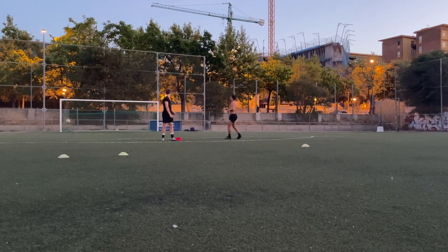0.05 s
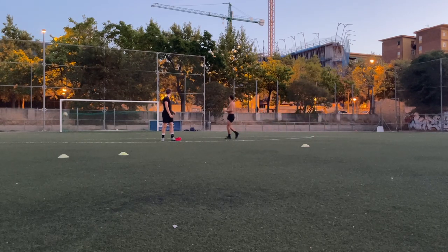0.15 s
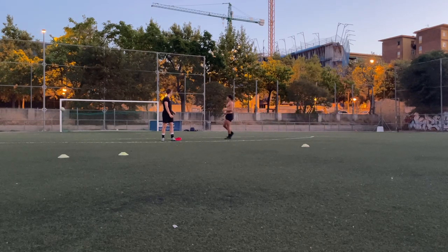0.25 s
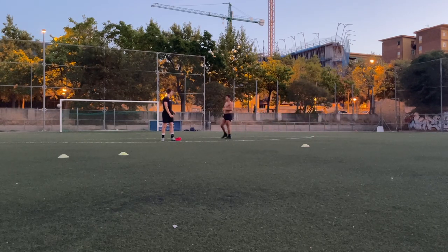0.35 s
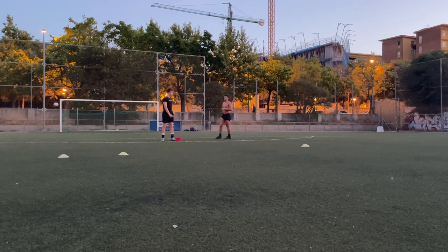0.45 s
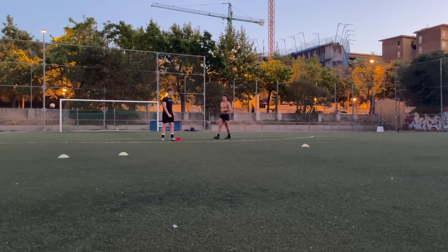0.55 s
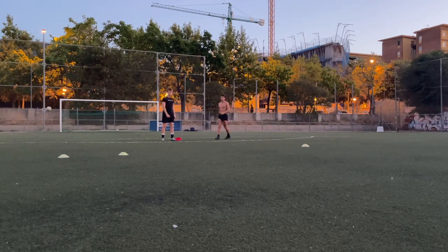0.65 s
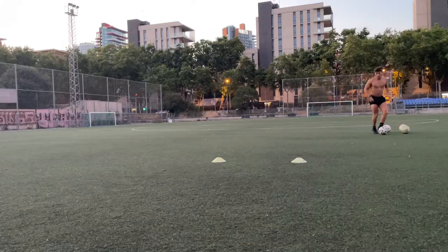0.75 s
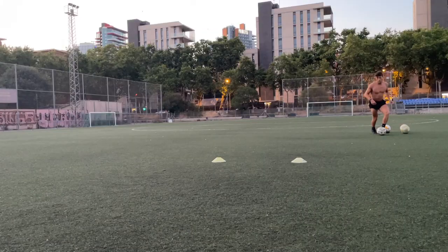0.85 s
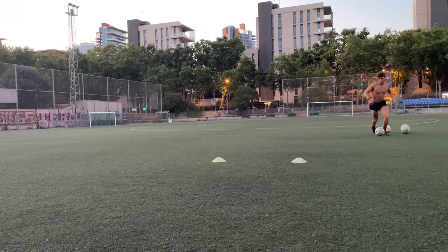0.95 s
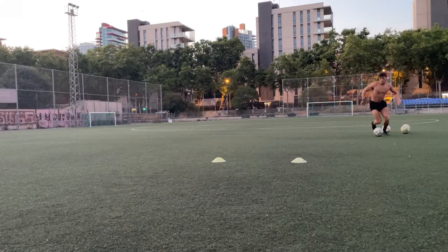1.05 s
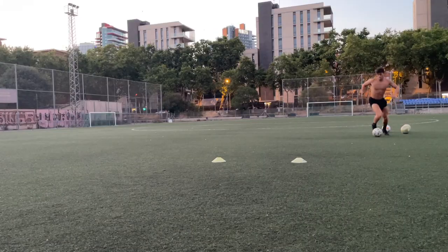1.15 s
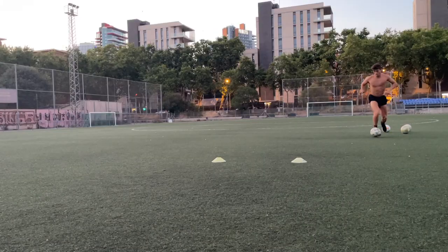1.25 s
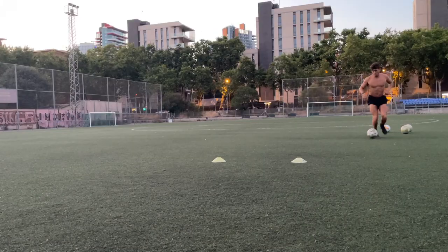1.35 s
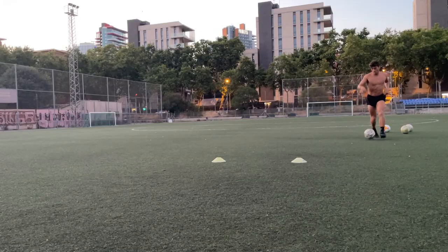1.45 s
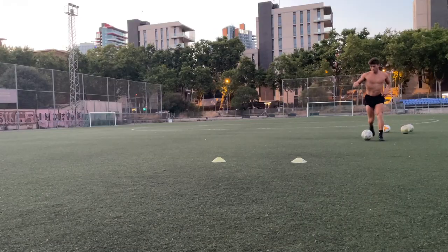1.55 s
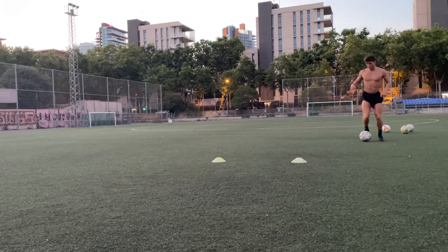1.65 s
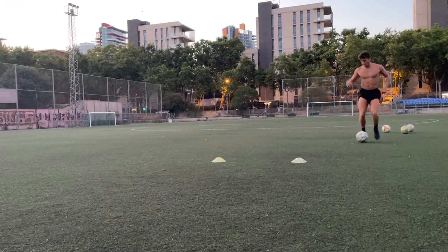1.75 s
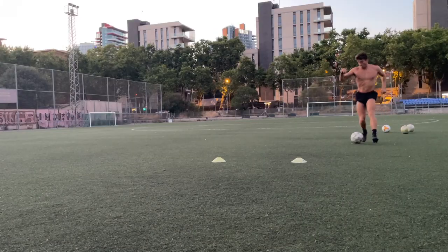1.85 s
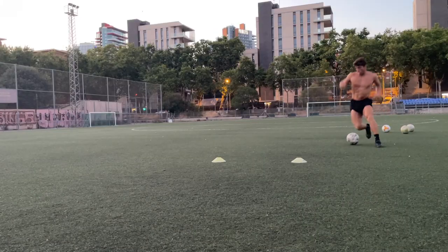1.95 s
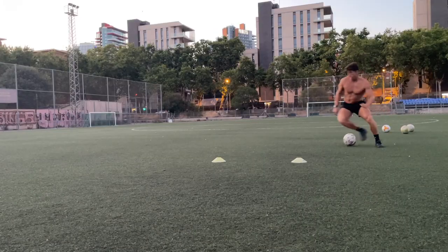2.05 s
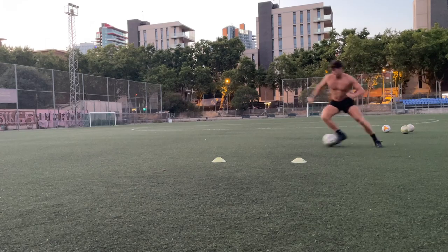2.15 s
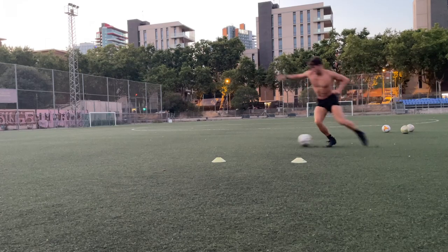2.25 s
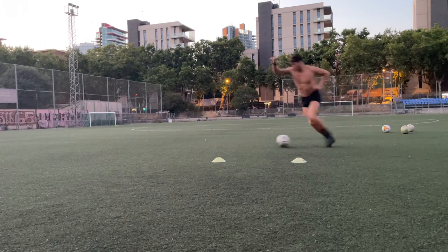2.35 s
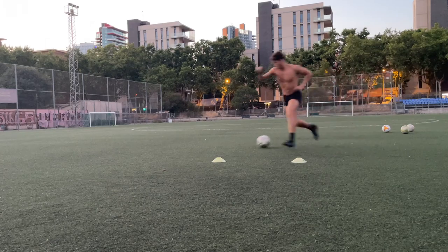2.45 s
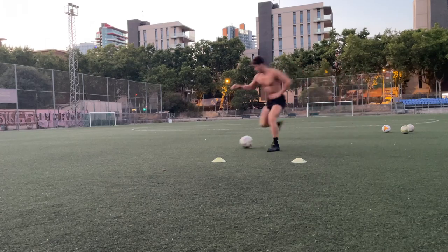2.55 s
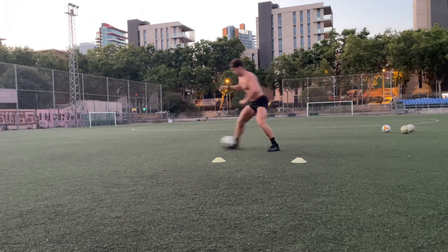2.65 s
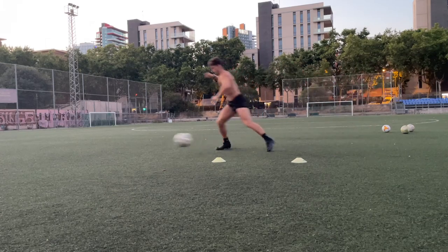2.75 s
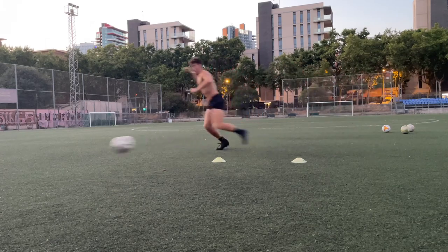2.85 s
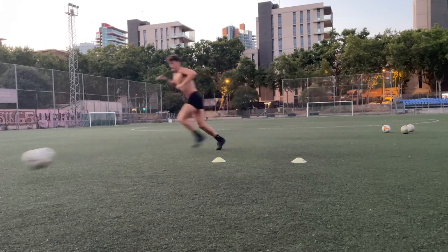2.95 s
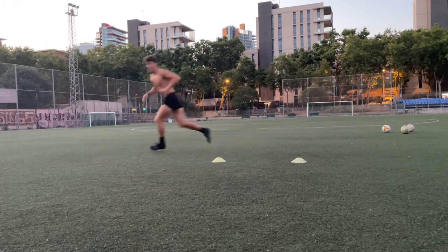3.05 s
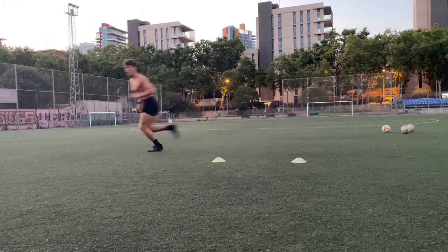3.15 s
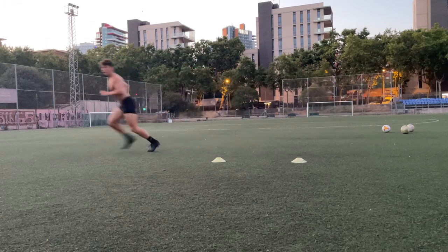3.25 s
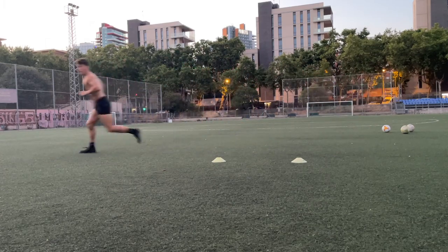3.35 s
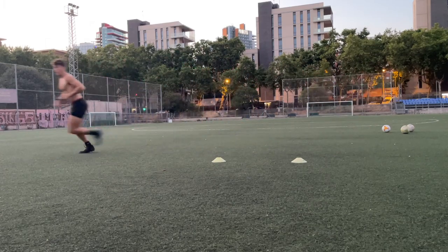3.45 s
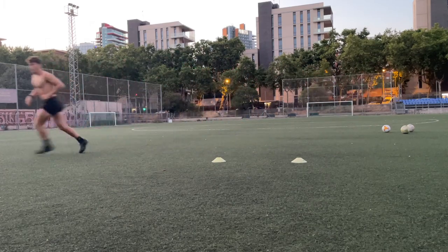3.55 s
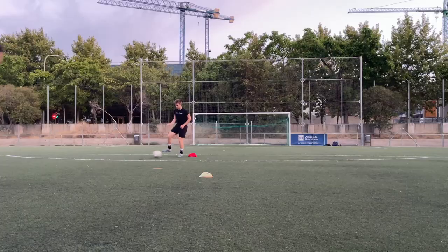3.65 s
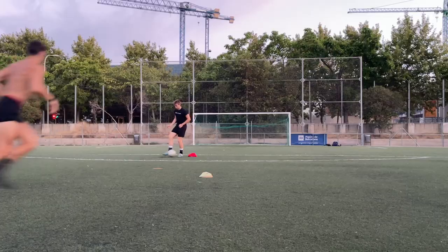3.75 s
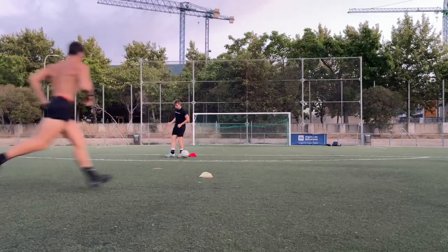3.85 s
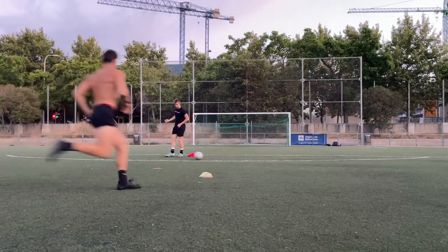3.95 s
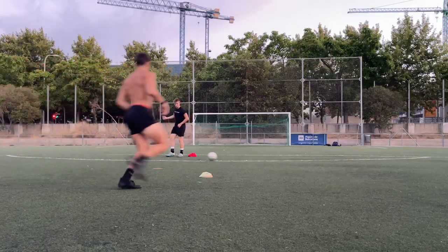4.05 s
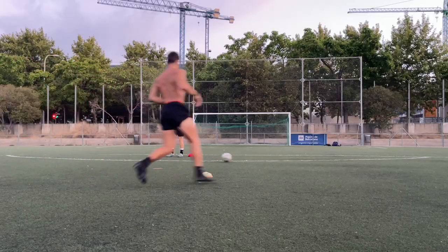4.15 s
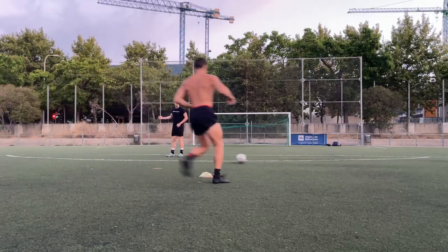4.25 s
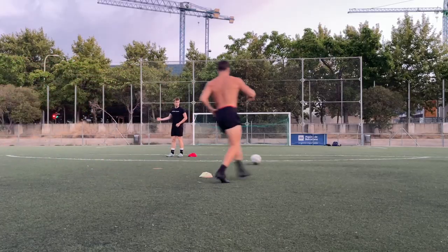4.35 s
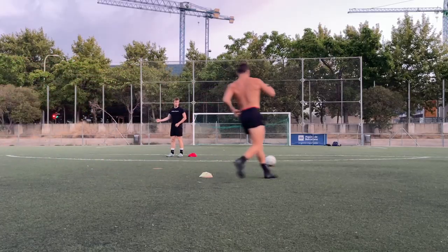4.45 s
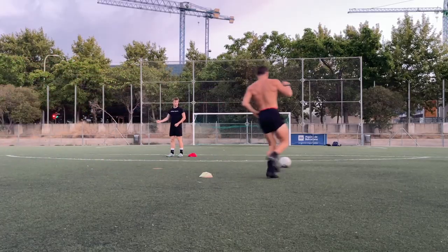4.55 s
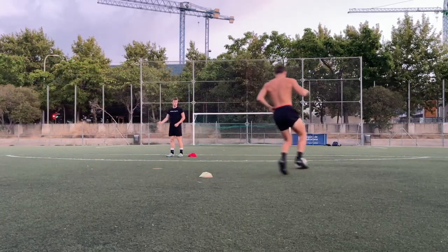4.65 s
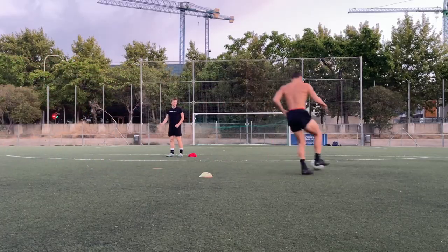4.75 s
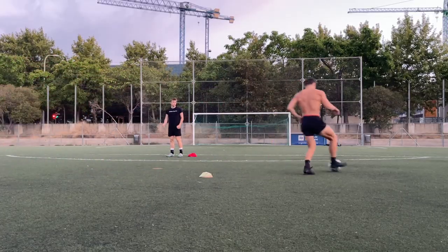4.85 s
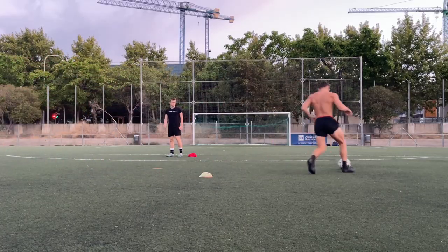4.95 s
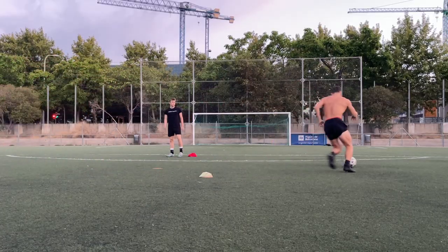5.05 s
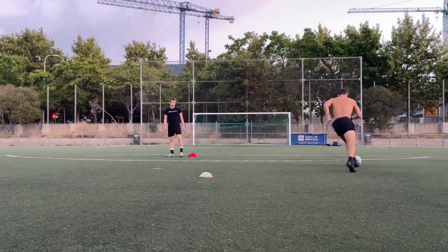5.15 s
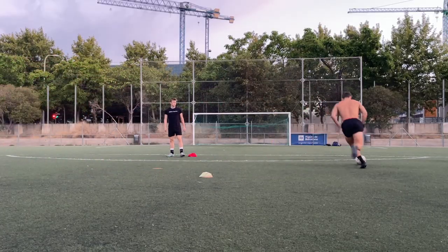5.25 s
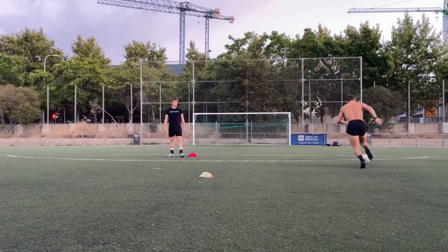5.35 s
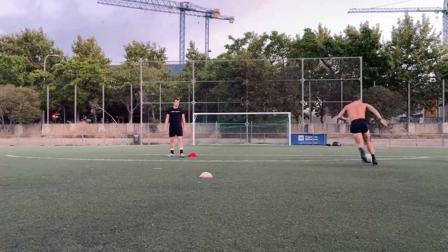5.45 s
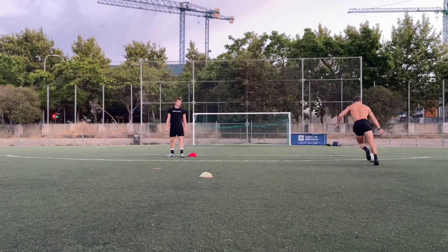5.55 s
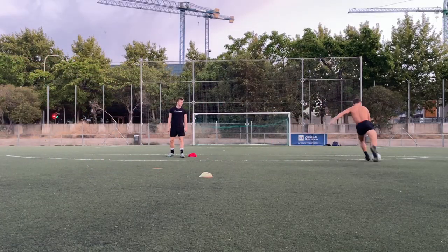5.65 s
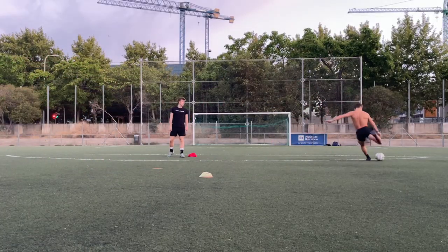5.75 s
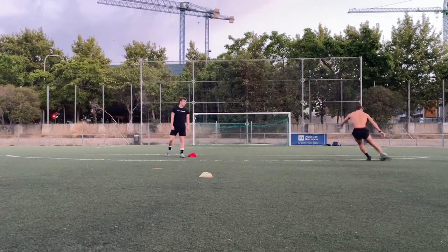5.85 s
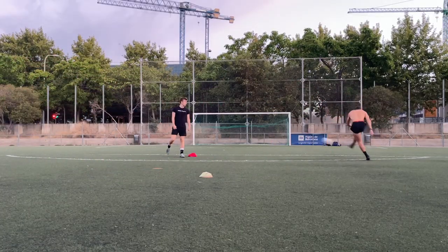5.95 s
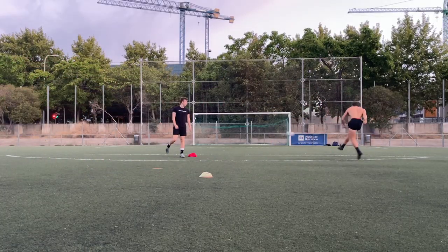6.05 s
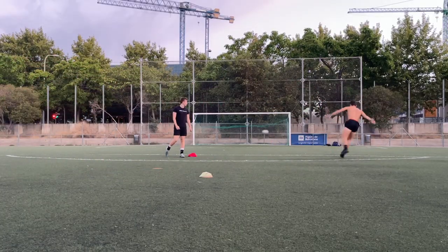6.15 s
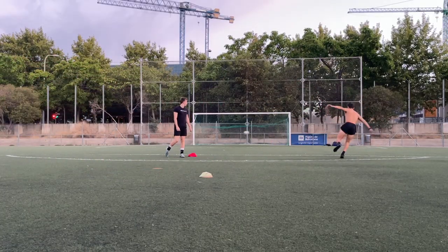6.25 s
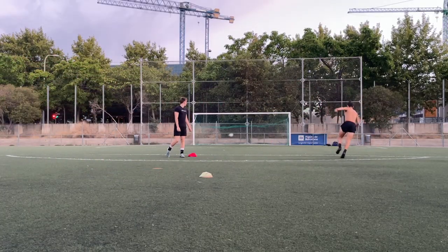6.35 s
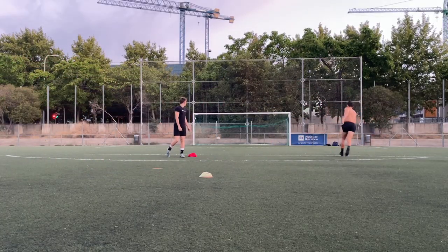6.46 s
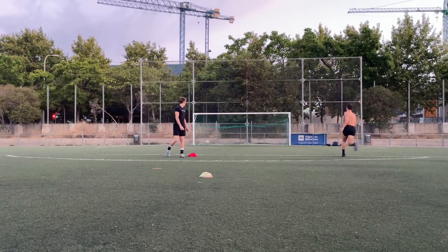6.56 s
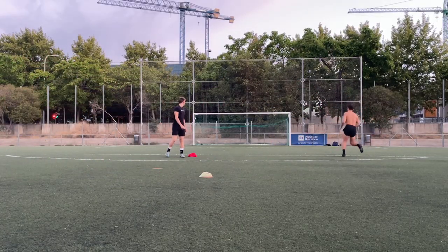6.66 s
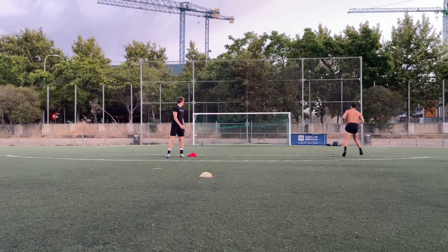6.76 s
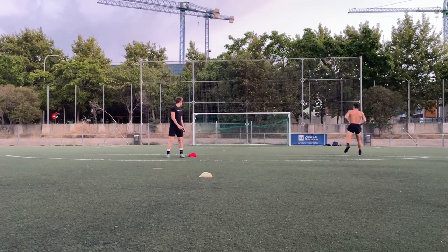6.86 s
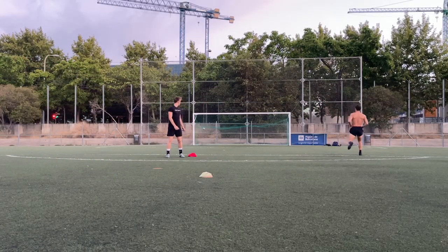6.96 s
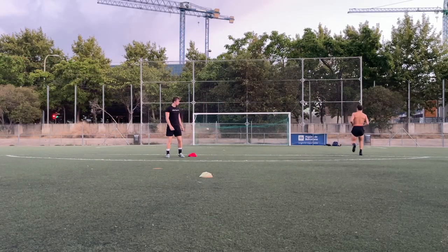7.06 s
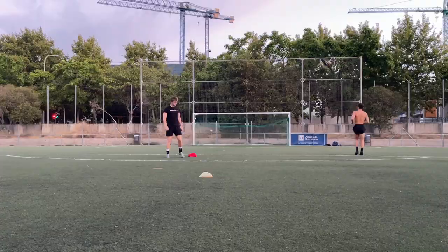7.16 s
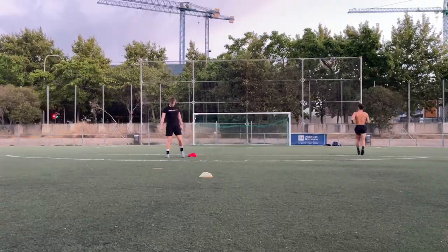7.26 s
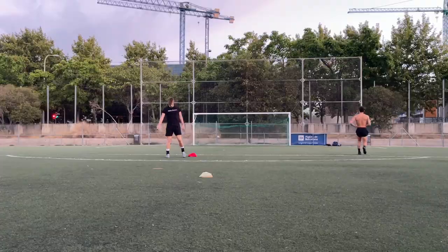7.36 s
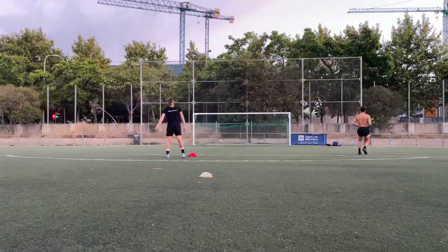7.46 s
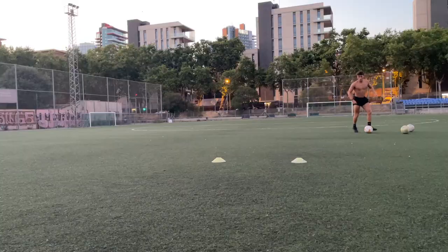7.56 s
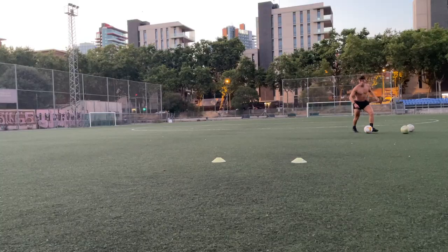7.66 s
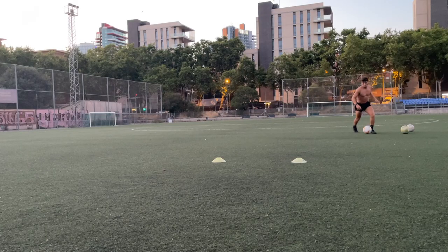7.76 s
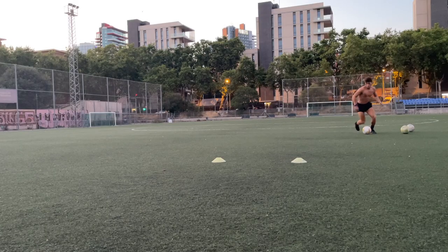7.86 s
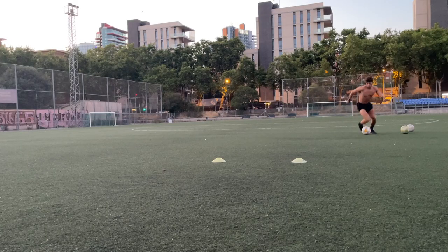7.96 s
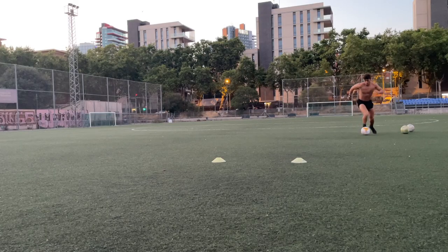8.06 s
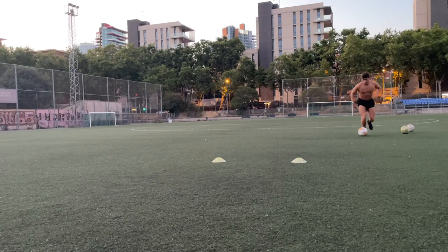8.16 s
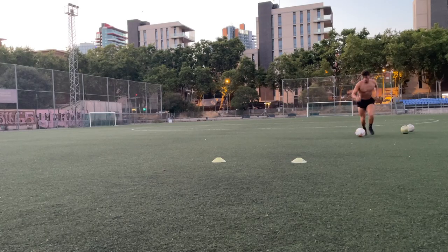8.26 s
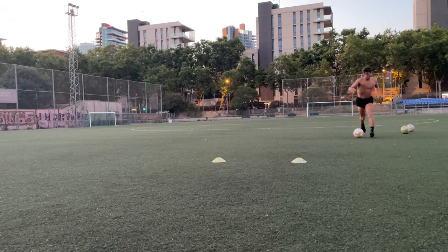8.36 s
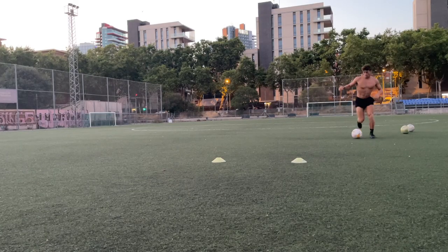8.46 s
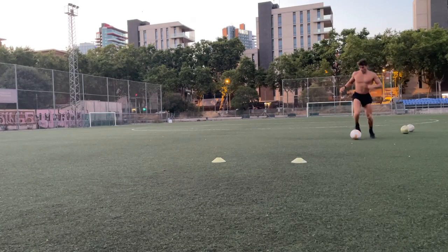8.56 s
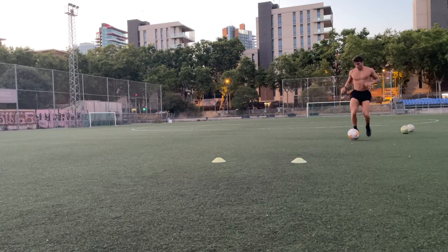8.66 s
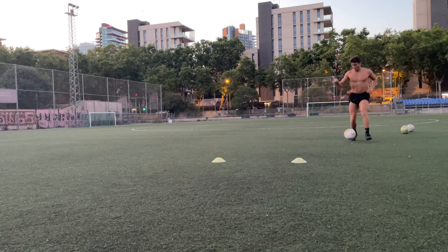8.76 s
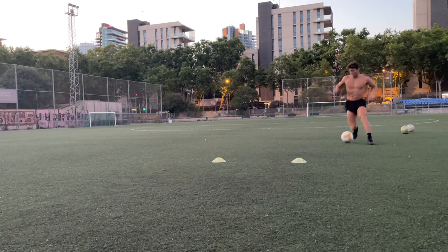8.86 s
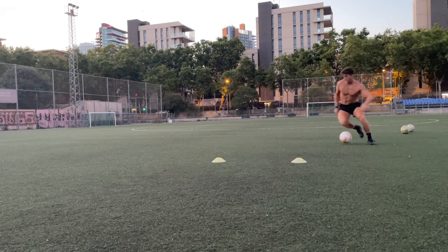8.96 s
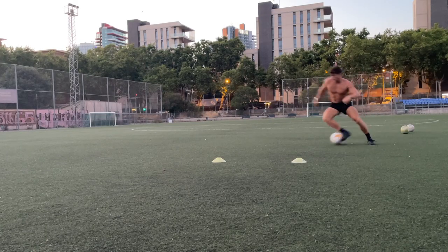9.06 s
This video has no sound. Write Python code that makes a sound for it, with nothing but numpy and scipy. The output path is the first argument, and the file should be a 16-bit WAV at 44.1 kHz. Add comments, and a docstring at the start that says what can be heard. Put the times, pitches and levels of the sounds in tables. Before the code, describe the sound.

Low city traffic rumble under football drills: scuffing boots, deep kick thumps, a booming shot into a rattling wire fence, swifts trilling overhead.

```python
"""Football drills on a city pitch at dusk, heard near a phone, over traffic of shaped noise.
A boom and a fading hiss open; swifts' sine trills, arched whistles and blurred cries recur overhead.
A click, then boots: swept thumps, noise slaps, scuffs and ticks; hollow taps; the ball skims past at 3 s.
A hard shot at 5.9 s booms in the net, then rattles the wire fence (noise grains, ringing wires).
Machinery noise and an idling engine (firing orders) join at 7.5 s. The hardest kicks overload the phone."""
import sys
import numpy as np
from scipy import signal
from scipy.fft import rfft, irfft, next_fast_len
from scipy.io import wavfile
from scipy.ndimage import uniform_filter1d, map_coordinates

SR = 44100
rng = np.random.default_rng(int(sys.argv[2]) if len(sys.argv) > 2 else 0)


def store_pcm(level_fs):
    """Save levels as 16-bit WAV."""
    pcm = np.round(np.clip(level_fs, -1, 1) * 32767).astype(np.int16)
    wavfile.write(sys.argv[1], SR, np.atleast_2d(pcm).T)


N = 401751

# Boot on ball. Each row: start in seconds, boom in dB, body and skin knock in dB over the boom,
# slap in dB before colouring, slap treble in dB against the slap.
KICK_ROWS = [(1.24, -18, -7, -34, -58, -16), (1.244, -33.5, 8, 8.5, -37, -27),
             (1.569, -33, 14, 0.5, -54, -8), (1.9614, -17, 12.5, -7.5, -51, -1),
             (2.1087, -28, 6.5, -2, -22.5, -11), (2.676, -4.5, -4.5, -25.5, -26.5, -17),
             (2.6775, -19.5, 8.5, 3, -14.5, -18.5), (3.5541, -1, -10.5, -19, -9, -12),
             (3.5623, -11, 0, -18, -25, -18), (3.774, -0.5, -3.5, -28, -9, -15.5),
             (3.785, -15.5, 10.5, 10, -34.5, -22), (3.919, -26.5, 3, -25, -36.5, -25),
             (4.9058, -1.5, -3.5, -12, -14.5, -14.5), (5.806, -30, 7.5, -7, -48, -5),
             (5.9041, 8, -1, -12.5, -10, -0.5), (6.585, -31, 7.5, -7, -67, -13),
             (6.723, -24.5, 5, -13, -52, 3), (8.085, -18.5, -11.5, -17, -17.5, -19.5),
             (8.635, -36, 3, 9.5, -50, -15), (8.8781, -17.5, 16, -5, -44, -9),
             (9.0542, -20, 7, 1.5, -17.5, -10.5)]
# Colour of the wire mesh. Each row: frequency in Hz, gain in dB.
MESH_COLOUR = [(500, -54), (1000, -8), (1600, -5), (2200, 0.5), (3300, 2.5), (4000, -0.5), (6200, -7),
               (7300, -11), (7900, -50), (9200, -39), (9800, -14), (11500, -16.5), (12800, -19),
               (14200, -88)]
# Backdrop levels, held from each start. Each row: start in seconds, drone, tyre roar and hiss in dB.
BACKDROP_STEPS = [(0, -38, -44.5, -58), (0.719, -45, -49.5, -57.5), (3.634, -39.5, -45, -48.5),
                  (7.523, -43, -48.5, -48)]


def amp(db):
    """Amplitude ratio of a level in dB."""
    return 10 ** (np.asarray(db) / 20)


def unit(x):
    """Scale to rms 1."""
    return x / np.sqrt(np.mean(x ** 2) + 1e-20)


def along(points, hz):
    """Interpolate (Hz, value) points on a log frequency axis."""
    f, v = np.transpose(points)
    return np.interp(np.log(hz + 1), np.log(f + 1), v)


def curves(rows):
    """One value per sample for each column after the time."""
    s, *cols = np.transpose(rows)
    return [np.interp(np.arange(N) / SR, s, c) for c in cols]


def wobble(knots_per_s):
    """A smooth random curve."""
    knots = rng.standard_normal(int(N * knots_per_s / SR) + 4)
    return map_coordinates(knots, [np.arange(N) * knots_per_s / SR])


def filtered(x, response):
    """x times a complex response of frequency."""
    m = next_fast_len(N + SR // 2)
    return irfft(rfft(x, m) * response(np.fft.rfftfreq(m, 1 / SR)), m)[..., :N]


def rush(colour, patchy_db):
    """Stereo noise of rms 1 with time-frequency patches of random gain."""
    # Left-right correlation. Each row: frequency in Hz, likeness from -1 to 1.
    likeness = [(60, 1), (130, 0.91), (290, 0.7), (640, -0.094), (1410, -0.12), (3100, 0.48), (6820, 0.12),
                (15000, 0.58)]
    z = signal.stft(rng.standard_normal((2, N)), nperseg=512)[2]
    patches = uniform_filter1d(rng.standard_normal(z.shape[1:]), 6, 0)
    patches = unit(uniform_filter1d(patches, 10, 1))
    pair = signal.istft(z * amp(patchy_db * patches), nperseg=512)[1][:, :N]

    def mid_side_gain(hz):
        angle = np.arccos(np.clip(along(likeness, hz), -1, 1)) / 2
        return amp(along(colour, hz)) * [np.cos(angle), np.sin(angle)]

    mid, side = filtered(pair, mid_side_gain)
    return unit(np.array([mid + side, mid - side]))


def ports(x):
    """A direct sound reaches the two ports out of step."""
    # Each row: frequency in Hz, lead of the left port in radians.
    lead_rows = [(0, 0), (1300, 1.1), (2400, 1.3), (4000, .7), (6800, 1.3), (8200, 2.2), (13000, 2),
                 (16000, 2)]
    return filtered(x, lambda hz: np.exp(.5j * np.outer([1, -1], along(lead_rows, hz))))


def bursts(events, colour, rise_s, t60_s, gritty_db):
    """Gritty noise bursts: a dull and a bright part under one envelope.

    Each event: start in seconds, level in dB before colouring, treble in dB against it."""
    # Colour of the bright part. Each row: frequency in Hz, gain in dB.
    bright_colour = [(2500, -39), (4000, -16), (5500, 0), (6800, 0.5), (8200, -12.5), (10300, -3),
                     (11800, -5), (13500, -16.5), (15000, -39), (16500, -44.5)]
    parts, t = np.zeros((2, N + SR)), np.arange(SR // 4)[:, None] / SR
    shapes = amp(-60 * t / t60_s) * (1 - np.exp(-t / rise_s))
    shapes = np.broadcast_to(shapes, (len(t), len(events))).T
    for (s, db, treble_db), shape in zip(events, shapes):
        steps = np.repeat(rng.standard_normal(len(t)), 24)[:len(t)]
        grit = rng.standard_normal((2, len(t))) * amp(gritty_db * steps)
        # the grit shapes a burst but leaves its energy
        grit = grit / np.sqrt((grit ** 2) @ shape ** 2 / (shape @ shape))[:, None]
        levels = amp([[db], [db + treble_db]])
        parts[:, round(s * SR):][:, :len(t)] += levels * shape / shape.max() * grit
    dull = filtered(parts[0, :N], lambda hz: amp(along(colour, hz) + 7.5))
    bright = filtered(parts[1, :N], lambda hz: amp(along(bright_colour, hz) + 10.0))
    return ports(dull + bright) * amp([[.4], [-.4]])


def blows():
    """Time and the knock, body, boom and thud levels of every kick, landing and dull boom."""
    # Heavy landings. Each row: start in seconds, boom in dB.
    footfall_rows = [(1.325, -29), (2.235, -30), (2.564, -28.5), (3.037, -20.5), (3.379, -29)]
    # Knock, body, boom and thud of a landing, in dB over its boom.
    foot_offsets_db = (-4, -44, 2, -27)
    # Dull booms: the opening one, the shot in the net, a heel. Each row: start in seconds, boom in dB.
    boom_rows = [(-.0075, -8.5), (6.04, -12.5), (6.058, -2), (6.112, -6.5), (6.245, -14.5), (6.282, -14.5),
                 (6.47, -13), (8.642, -19)]
    # Knock, body, boom and thud of a dull boom, in dB over its boom.
    boom_offsets_db = (-47, -32.5, 0.5, -27.5)
    thud_db = -15.5  # over the boom of a kick
    kicks = [(s, db + knock_db, db + body_db, db, db + thud_db)
             for s, db, body_db, knock_db, _, _ in KICK_ROWS]
    landings = [(s, *np.add(db, foot_offsets_db)) for s, db in footfall_rows]
    booms = [(s, *np.add(db, boom_offsets_db)) for s, db in boom_rows]
    return kicks + landings + booms


def thumps():
    """Each blow is one push whose bass arrives late, so it sweeps down in pitch like a drum."""
    # Knock, body, boom, thud. Each row: centre in Hz, width in octaves, early start in ms.
    ball_bands = [(500, .4, -.5), (240, .5, 1), (118, .5, 2.8), (68, .4, 2.8)]
    # Each row: frequency in Hz, left-right difference of a blow against its middle in dB.
    spread_rows = [(60, -14.5), (110, -21.5), (200, -14.5), (400, -16.5), (700, -10.5)]
    flap_db, flap_t60_s = 9, 0.06  # flapping over the knock, before the band filter
    size, lead = SR // 4, SR // 20
    hz = np.fft.rfftfreq(size, 1 / SR) + 1e-3
    power, late_s, turn_cycles = 1.397, .02, .326  # delay = late_s (95 / Hz) ^ power
    cycles = late_s * 95 / (power - 1) * (95 / np.maximum(hz, 25)) ** (power - 1)
    cycles = cycles + turn_cycles - hz * lead / SR
    bands = []
    for centre_hz, octaves, early_ms in ball_bands:
        bell = -.5 * (np.log2(hz / centre_hz) / octaves) ** 2
        band = np.exp(bell + 2j * np.pi * (cycles + hz * early_ms / 1000))
        bands.append(band / np.abs(irfft(band, size)).max())
    casing = signal.butter(2, [300, 750], "band", fs=SR, output="sos")
    gate = np.clip((np.arange(size) - lead) / 40, 0, 1)  # silent before the contact
    out = np.zeros((2, N + SR))  # middle and left-right difference
    for s, *db in blows():
        # no two contacts alike
        ripple = np.interp(hz, np.geomspace(150, 2500, num=20), rng.standard_normal(20), left=0)
        # random phase of the difference: each blow comes from its own side
        aside = amp(along(spread_rows, hz)) * np.exp(2j * np.pi * rng.uniform())
        push = amp(db) @ bands * amp(3 * ripple)
        start = round(s * SR)
        out[:, lead + start:][:, :size] += gate * irfft(push * [np.ones(len(hz)), aside], size)
        # the casing flaps raggedly for a moment
        flap = amp(db[0] + flap_db - 60 * np.arange(size) / SR / flap_t60_s)
        skin = rng.standard_normal((2, size)) * amp([[0], [-14]]) * flap
        out[:, 2 * lead + start:][:, :size] += signal.sosfilt(casing, skin)
    mid, side = out[:, 2 * lead:][:, :N]
    return np.array([amp(-0.53) * (mid + side), amp(-2.3) * (mid - side)])


def wash():
    """A noise hiss dying away at a steady dB rate from the start."""
    # Each row: frequency in Hz, gain in dB.
    wash_colour = [(700, -21), (1300, 4.5), (2200, 7), (3400, -0.5), (4500, -9.5), (6300, -13), (7500, -26),
                   (7900, -86)]
    start_db, fall_db_per_s, end_s = -38, 25, .718
    t = np.arange(N) / SR
    return amp(start_db - fall_db_per_s * t) * (t < end_s) * rush(wash_colour, patchy_db=1.5)


def city():
    """Far traffic as shaped noise: a lumpy rumble, engine drone, tyre roar and hiss, stepping in level."""
    # Each row: time in seconds, rumble in dB.
    traffic_rows = [(0, -25), (.57, -28), (.715, -26.5), (.72, -31), (.97, -34), (3.01, -31.5),
                    (3.36, -33.5), (3.6, -33), (3.65, -27), (3.85, -24.5), (5.44, -28), (6.16, -23),
                    (7.13, -28.5), (7.5, -24.5), (7.54, -29.5), (7.86, -32.5), (9.11, -30)]
    # Colours of the four noises. Each row: frequency in Hz, gain in dB.
    rumble_colour = [(12, -47.5), (20, -38), (46, -4.5), (64, 1), (97, -3), (134, -7.5), (157, -11),
                     (190, -16), (260, -29.5), (340, -50.5), (570, -120)]
    drone_colour = [(120, -26.5), (190, 6), (260, -1), (350, -4), (500, -12), (900, -93)]
    roar_colour = [(400, -5), (600, -2.5), (900, 0), (1200, -5), (1600, -18), (2600, -97.5)]
    hiss_colour = [(800, -13.5), (1300, 4.5), (1900, 0.5), (3400, -7), (4300, -5), (5200, -12.5),
                   (7300, -20), (7800, -57), (9000, -31.5), (10500, -29), (13000, -35.5), (14200, -97)]
    drone_follows, hiss_follows = 1, 0.5  # dB per dB of rumble within one step
    rumble_db, = curves(traffic_rows)
    starts, *levels = np.transpose(BACKDROP_STEPS)
    step = np.clip(np.searchsorted(starts, np.arange(N) / SR, "right") - 1, 0, None)
    drone_db, roar_db, hiss_db = np.array(levels)[:, step]
    step_mean_db = np.bincount(step, rumble_db) / np.bincount(step)
    ebb_db = rumble_db - step_mean_db[step]
    swell = wobble(5.2)
    rumble_db = rumble_db + 1.2 * swell + 1.8 * wobble(18)
    drone_db = drone_db + drone_follows * ebb_db + 0.6 * swell + 1.4 * wobble(27)
    roar_db = roar_db + 0.7 * wobble(12)
    hiss_db = hiss_db + hiss_follows * ebb_db + 0.16 * wobble(12.0)
    rumble = amp(rumble_db) * rush(rumble_colour, patchy_db=0.0)
    drone = amp(drone_db) * rush(drone_colour, patchy_db=2.2)
    roar = amp(roar_db) * rush(roar_colour, patchy_db=1.5)
    hiss = amp(hiss_db) * rush(hiss_colour, patchy_db=2.5)
    return rumble + drone + roar + hiss


def ticks():
    """Lone dry ticks, mostly studs: noise bursts of about a millisecond."""
    # Each row: start in seconds, level in dB before colouring, treble in dB against it.
    tick_rows = [(0.562, -42, -31), (1.212, -15, -19.5), (1.5825, -51, 8), (2.301, -42.5, -17),
                 (2.319, -36.5, -16), (2.511, -44, -30), (2.654, -30, -20), (2.859, -35, -38),
                 (3.0993, -41, -13), (3.132, -51, 2), (3.146, -55, 5), (3.879, -35.5, -16),
                 (6.0612, -27.5, -7), (6.7875, -19, -4.5), (6.793, -25, -9), (7.295, -38, -20),
                 (7.3143, -35, -30), (7.3317, -35, -30), (8.4494, -45, 4), (8.6715, -29, -33)]
    # Each row: frequency in Hz, gain in dB.
    tick_colour = [(600, -26), (1200, -31), (2000, -0.5), (2900, 7), (4400, -2), (5800, -16), (7500, -36)]
    return bursts(tick_rows, tick_colour, rise_s=0.0002, t60_s=0.0013, gritty_db=0)


def swifts():
    """Swept sines: arched hoarse whistles and trills of short falling chips."""
    # Whistles. Each row: start in seconds, length in seconds, top in Hz, level in dB,
    # hoarseness in Hz before smoothing.
    cry_rows = [(2.865, 0.11, 4090, -47.5, 130), (4.59, 0.039, 4230, -57, 600),
                (4.748, 0.031, 4400, -50.5, 600), (5.538, .07, 4620, -50.5, 600),
                (5.795, .095, 4500, -48, 600)]
    # Trills. Each row: first chip in seconds, limit for the last in seconds, spacing in seconds,
    # nominal pitch in Hz, mean level in dB.
    trill_rows = [(0.576, .65, 0.065, 4060, -48), (5.712, 5.79, 0.068, 4300, -48),
                  (6.005, 6.72, .0635, 4400, -50.5), (6.953, 7.265, .0605, 4720, -44),
                  (8.122, 8.135, 0.0079, 4895, -50), (8.911, 8.92, 0.063, 4480, -43)]
    arch_start, arch_end = .87, .94  # pitch at either end over the top
    arch_lean = .85  # under 1 the top comes early
    end_drop = 0.064  # share of pitch lost in the last moment
    out = np.zeros(N + SR)
    for start, length, hz, db, hoarse_hz in cry_rows:
        u = np.linspace(0, 1, round(length * SR))
        arch = np.polyval(np.polyfit([0, .5, 1], [arch_start, 1, arch_end], 2), u ** arch_lean)
        hoarse = hoarse_hz * uniform_filter1d(rng.standard_normal(len(u)), 60)
        pitch_hz = hz * arch * (1 - end_drop * u ** 12) + hoarse
        whistle = np.sin(2 * np.pi * np.cumsum(pitch_hz) / SR)
        out[round(start * SR):][:len(u)] += amp(db) * np.sin(np.pi * u ** 3.3) ** 0.25 * whistle
    t = np.arange(round(.013 * SR)) / SR
    for first, last, spacing, hz, db in trill_rows:
        for s in np.arange(first, last, spacing):
            cycles = hz * rng.normal(1, .004) * (1.05 * t - 4.5 * t * t)
            chip = np.hanning(len(t)) * np.sin(2 * np.pi * cycles)
            out[round(s * SR):][:len(t)] += amp(rng.normal(db, 1.8)) * chip
    return out[:N] * amp([[2.5], [-2.5]])


def jump():
    """A flat, full click: pressure builds exponentially, then drops to zero at once."""
    # Drop in seconds, height in dB, build-up time constant in seconds.
    drop_s, height_db, build_s = (.72, -21, .002)
    t = np.arange(N) / SR - drop_s
    return amp(height_db) * (t < 0) * np.exp(np.minimum(t, 0) / build_s)


# Dull part of slaps and scuffs. Each row: frequency in Hz, gain in dB.
BOOT_COLOUR = [(500, -31), (1200, -7.5), (2000, -4), (3300, -6), (4500, -9), (6500, -24)]


def scuffs():
    """Boots dragging through the turf: gritty crunches, each with its own decay."""
    # Each row: start in seconds, level in dB before colouring, t60 in seconds.
    scuff_rows = [(0.796, -55, .2), (1.2433, -44.5, 0.13), (1.391, -51, 0.21), (1.5253, -57, 0.25),
                  (1.569, -54, 0.18), (1.733, -49, 0.18), (1.845, -54.5, .2), (1.938, -48, 0.43),
                  (1.974, -48, 0.47), (2.103, -37, 0.078), (2.129, -44, 0.21), (2.231, -44.5, 0.11),
                  (2.356, -49.5, .12), (2.487, -57, 0.21), (2.576, -54.5, 0.33), (2.69, -43.5, 0.24),
                  (3.033, -31.5, 0.077), (3.279, -40.5, 0.11), (3.376, -49.5, 0.17), (3.4946, -42, 0.23),
                  (3.636, -48.5, 0.15), (3.927, -44, 0.48), (4.2467, -42.5, 0.13), (4.502, -49, 0.1),
                  (5.078, -50.5, .25), (5.691, -44.5, 0.24), (6.027, -45.5, 0.28), (6.0588, -35.5, 0.3),
                  (8.645, -41.5, .13), (8.874, -46.5, .2), (9.0878, -42, .2)]
    events = [(s, db, -12) for s, db, _ in scuff_rows]  # treble -12 dB
    t60_s = np.transpose(scuff_rows)[2]
    return bursts(events, BOOT_COLOUR, rise_s=0.01 * t60_s, t60_s=t60_s, gritty_db=3)


def screeches():
    """Far swifts smear into fluttering puffs of narrow noise."""
    # Each row: start in seconds, level in dB.
    screech_rows = [(1.99, -54.5), (1.175, -60), (1.21, -54.5), (2.14, -55), (2.26, -59), (3.165, -55),
                    (3.385, -53), (5.33, -54), (7.97, -57), (8.235, -53.5), (8.399, -50), (8.55, -60),
                    (8.8, -56)]
    length_s = 0.052
    t = np.arange(N) / SR
    puffs = sum(amp(db) * np.sin(np.pi * np.clip((t - s) / length_s, 0, 1)) for s, db in screech_rows)
    colour = [(3300, -59), (3900, -6), (4400, 1), (4900, -7), (5400, -66)]  # Hz, dB
    return amp(2.4 * wobble(120)) * puffs * rush(colour, patchy_db=1.5)


def slaps():
    """Boot leather on the ball: a few milliseconds of noise; the casing springs back and slaps again."""
    rebound_s, rebound_db, rebound_treble_db = 0.011, -15.5, -3
    first = [(s, db, treble_db) for s, *_, db, treble_db in KICK_ROWS]
    again = [(s + rebound_s, db + rebound_db, treble_db + rebound_treble_db)
             for s, db, treble_db in first]
    return bursts(first + again, BOOT_COLOUR, rise_s=0.000066, t60_s=0.016, gritty_db=6.5)


def taps():
    """Short hollow taps: a decaying sine whose phase wanders, a narrow puff of noise round one pitch."""
    # Each row: start in seconds, pitch in Hz, level in dB.
    tap_rows = [(1.245, 1300, -33), (1.988, 1900, -40), (3.94, 2500, -42), (5.95, 3200, -42)]
    rise_s, t60_s = 0.00055, 0.053
    out, t = np.zeros(N + SR), np.arange(SR // 10) / SR
    for s, hz, db in tap_rows:
        waver = np.cumsum(rng.normal(0, 0.065, len(t)))
        envelope = amp(db - 60 * t / t60_s) * (1 - np.exp(-t / rise_s))
        out[round(s * SR):][:len(t)] += envelope * np.sin(2 * np.pi * hz * t + waver)
    return out[:N] * amp([[1.2], [-1.2]])


def skim():
    """The ball skims past over the turf: a hollow noise swish that swells and trails off."""
    # Start in seconds, length in seconds, level in dB.
    start_s, length_s, level_db = (2.955, .17, -43)
    # Each row: frequency in Hz, gain in dB.
    skim_colour = [(500, -40), (850, -5), (1250, 0), (1650, -14), (2050, -9), (2450, -12), (3000, -24),
                   (7000, -29), (8200, -50), (10500, -33), (13500, -36), (15000, -70)]
    u = np.clip((np.arange(N) / SR - start_s) / length_s, 0, 1)
    swell = amp(level_db + 1.5 * wobble(80)) * np.sin(np.pi * u ** 0.83)
    return swell * rush(skim_colour, patchy_db=2.5)


def fence():
    """The swinging mesh: links chatter in dense noise grains while a few resonant wires sing."""
    # Each row: start in seconds, links in dB, wires in dB.
    shake_rows = [(6.71, -49, -58.5), (6.746, -36.5, -53), (6.88, -44.5, -50), (7.02, -43.5, -44.5),
                  (7.11, -66, -55)]
    # Resonances. Each row: centre in Hz, width in Hz, gain in dB.
    wire_rows = [(2210, 60, -2), (2830, 50, 0), (6250, 160, 3)]
    rise_s, links_t60_s, wires_t60_s = 0.014, 0.94, 0.48
    chatter = rush(MESH_COLOUR, patchy_db=1.2) * amp(3.2 * wobble(250) + 1.5 * wobble(30))

    def sing(f):
        return sum(amp(db) * 1j * f * w / (c * c - f * f + 1j * f * w) for c, w, db in wire_rows)

    wires = unit(filtered(rng.standard_normal(N), sing))
    starts, links_db, wires_db = np.transpose(shake_rows)[..., None]
    t = np.clip(np.arange(N) / SR - starts, 0, None)

    def shaking(db, t60_s):
        return np.linalg.norm(amp(db - 60 * t / t60_s) * (1 - np.exp(-t / rise_s)), axis=0)

    return shaking(links_db, links_t60_s) * chatter + shaking(wires_db, wires_t60_s) * ports(wires)


def fence_crashes():
    """The ball crashing into the mesh: gritty bursts in the mesh's colour."""
    # Each row: start in seconds, level in dB before colouring, treble in dB against it.
    crash_rows = [(6.757, -36, -12), (6.796, -28, -22), (6.825, -36, -25)]
    return bursts(crash_rows, MESH_COLOUR, rise_s=0.0017, t60_s=0.11, gritty_db=3.5)


def machinery():
    """A steady band of far machinery noise, on to the end."""
    # Start in seconds, level in dB, centre in Hz, width in Hz.
    start_s, level_db, hz, width_hz = (7.52, -54, 1900, 300)
    colour = [(hz / 3, -50), (hz - width_hz, -9), (hz, 0), (hz + width_hz, -18), (hz * 2, -90)]
    return amp(level_db) * (np.arange(N) > start_s * SR) * rush(colour, patchy_db=1)


def engine():
    """An idling engine: firing orders, each wavering in level and phase, from the last backdrop step."""
    # Each row: time in seconds, firing rate in Hz.
    firing_rows = [(7.53, 45.3), (7.864, 46.2), (8.968, 45.18), (9.11, 45.2)]
    # Each row: multiple of the firing rate, relative level in dB.
    order_rows = [(1, 0.5), (2, -4.5), (3, -2), (4, -7.5), (5, -5.5), (6, -11.5), (7, -27)]
    level_db = -35.5
    phase = 2 * np.pi * np.cumsum(curves(firing_rows)[0]) / SR
    hum = np.zeros(N)
    for k, db in order_rows:
        level = amp(db + 4.7 * wobble(5.6))
        hum += level * np.sin(k * phase + .5 * wobble(4.4) + rng.uniform(0, 2 * np.pi))
    return amp(level_db) * unit(hum) * (np.arange(N) > BACKDROP_STEPS[-1][0] * SR)


def scene():
    """All sources summed, in stereo."""
    backdrop = wash() + city() + machinery() + engine()
    birds = swifts() + screeches()
    play = thumps() + slaps() + scuffs() + ticks() + taps() + skim()
    return backdrop + birds + play + fence() + fence_crashes() + jump()


def record(dry):
    """The phone saturates near full scale and keeps nothing above its band limit."""
    top_hz = 16200
    clipped = dry / (1 + np.abs(dry) ** 12) ** (1 / 12)
    return np.clip(filtered(clipped, lambda hz: hz < top_hz), -1, 1)


dry = scene()
out = record(dry)
store_pcm(out)
```